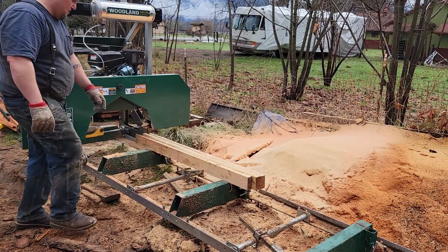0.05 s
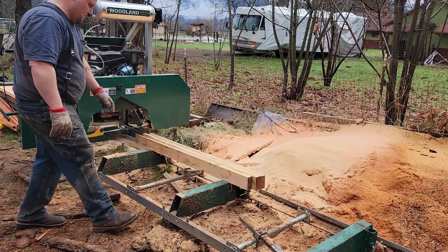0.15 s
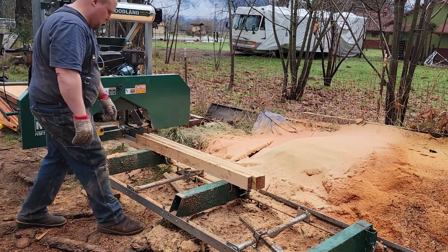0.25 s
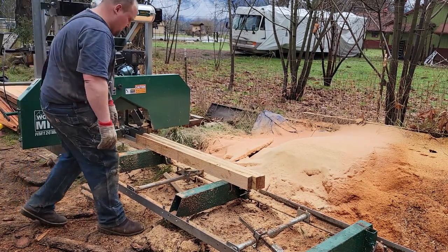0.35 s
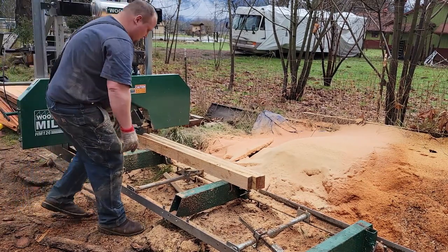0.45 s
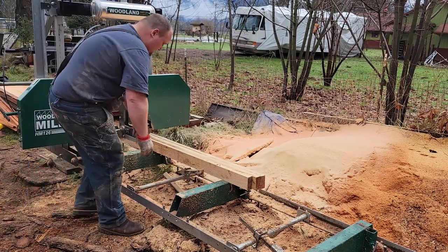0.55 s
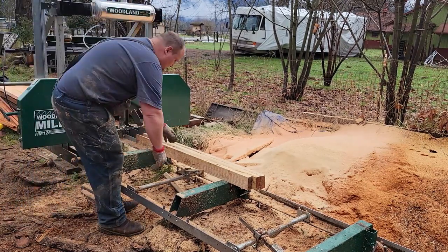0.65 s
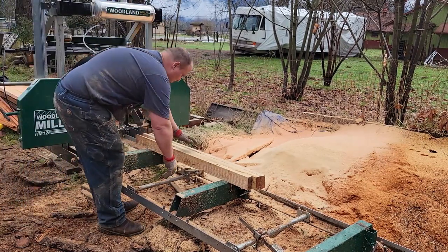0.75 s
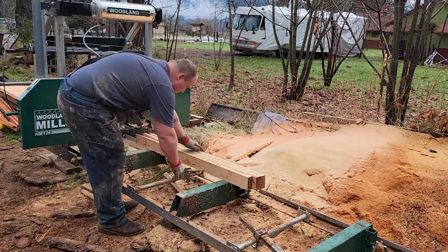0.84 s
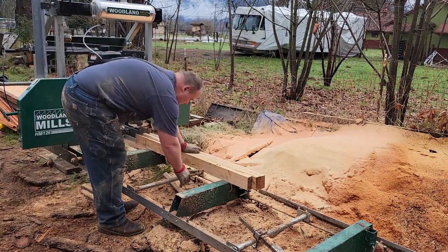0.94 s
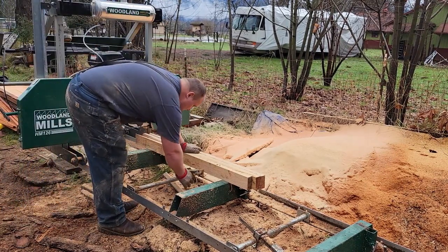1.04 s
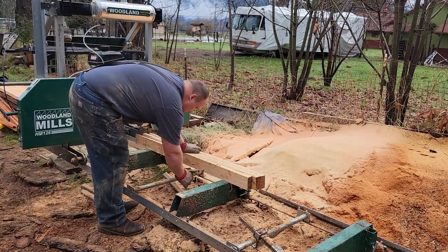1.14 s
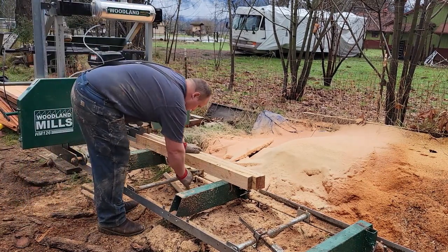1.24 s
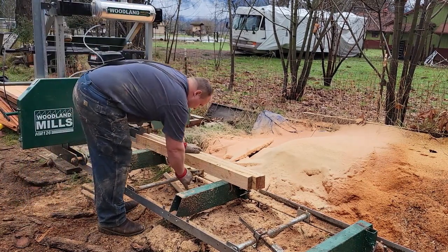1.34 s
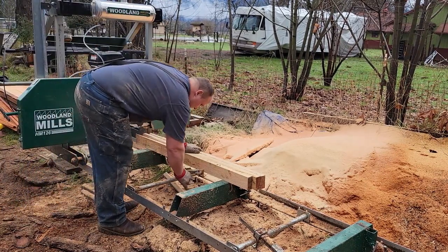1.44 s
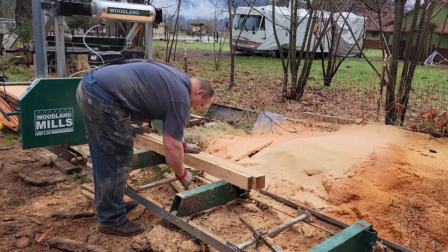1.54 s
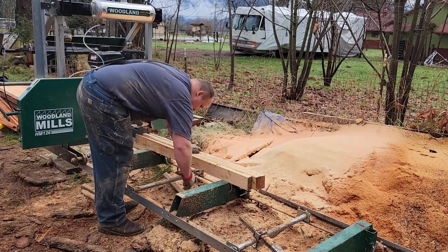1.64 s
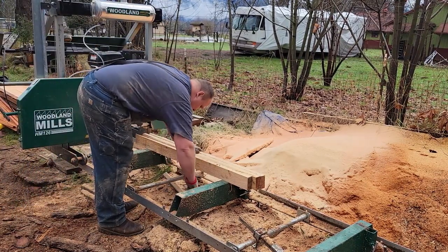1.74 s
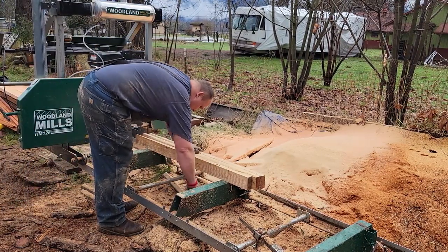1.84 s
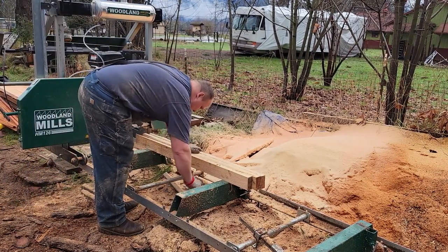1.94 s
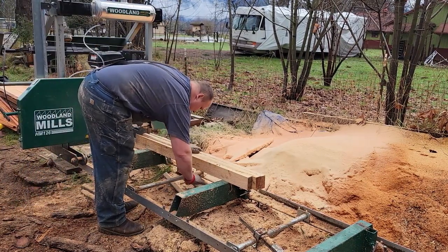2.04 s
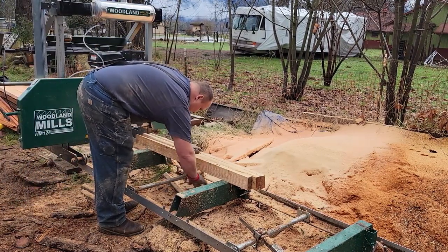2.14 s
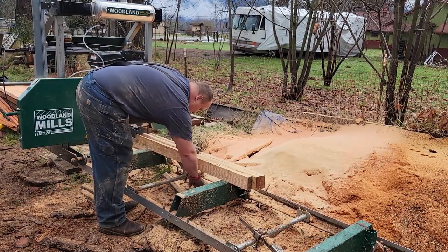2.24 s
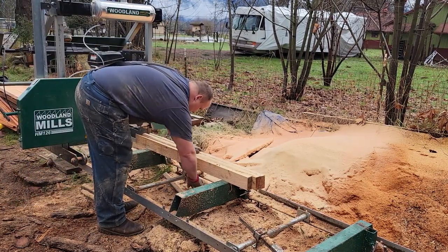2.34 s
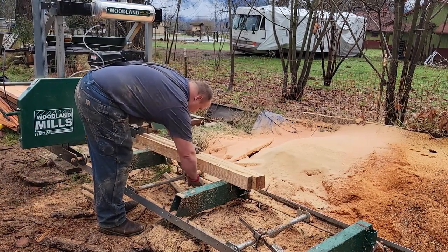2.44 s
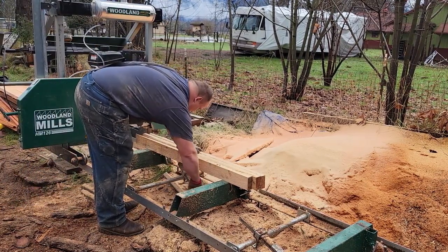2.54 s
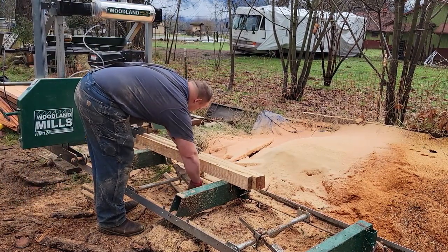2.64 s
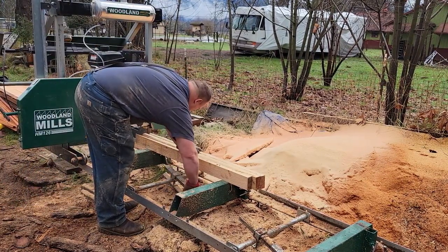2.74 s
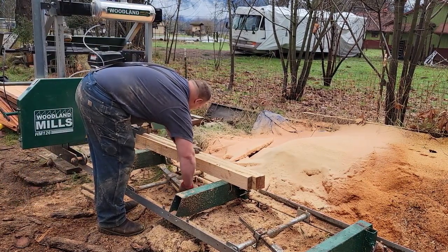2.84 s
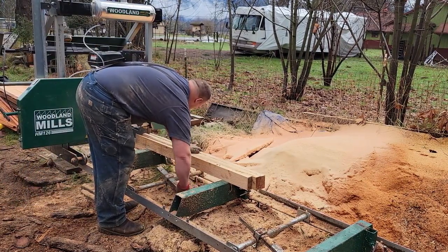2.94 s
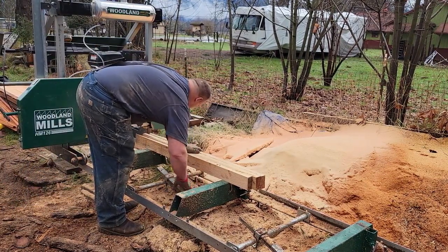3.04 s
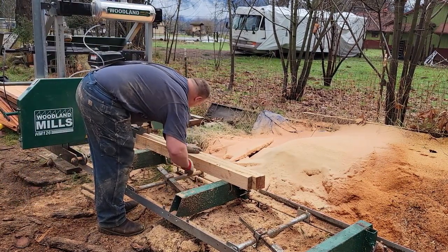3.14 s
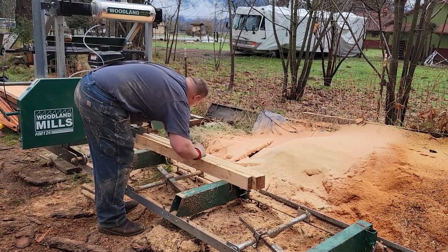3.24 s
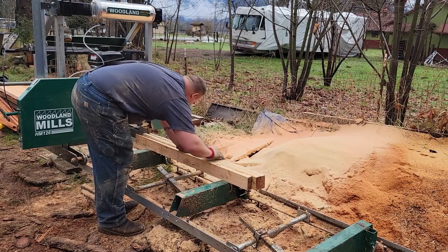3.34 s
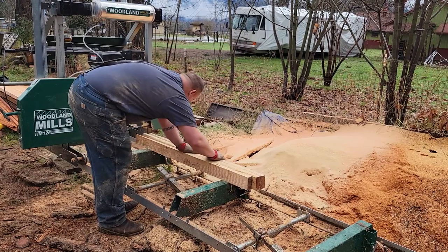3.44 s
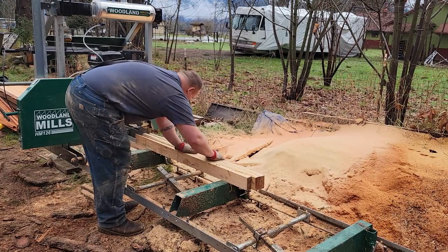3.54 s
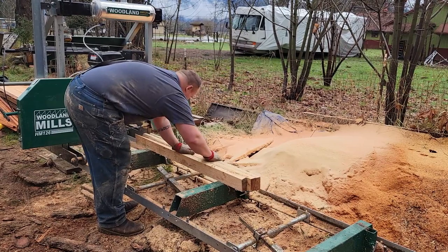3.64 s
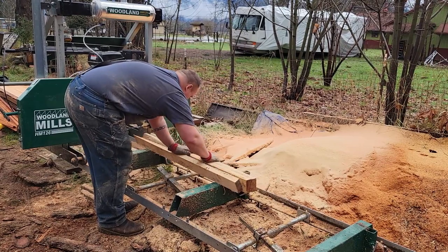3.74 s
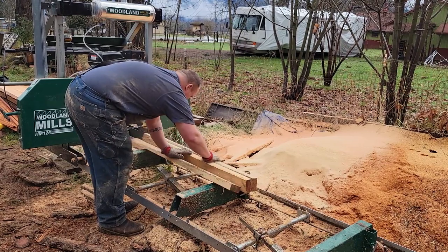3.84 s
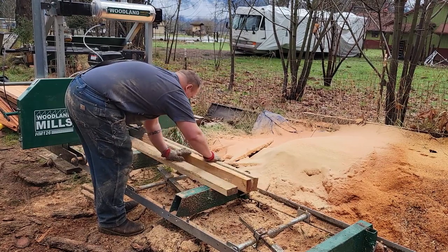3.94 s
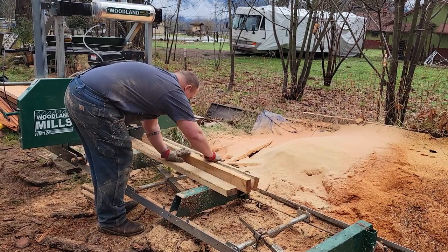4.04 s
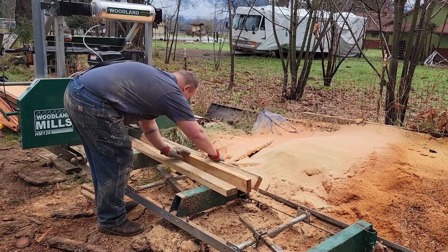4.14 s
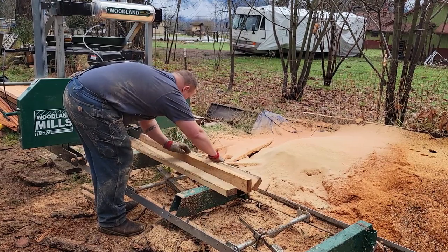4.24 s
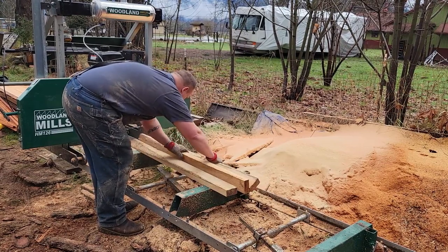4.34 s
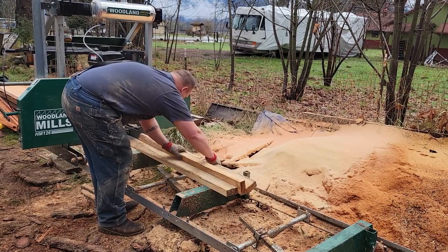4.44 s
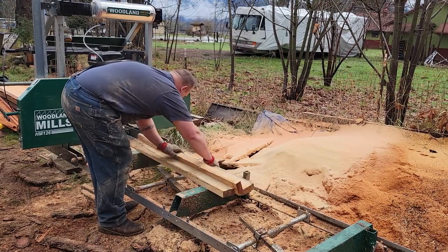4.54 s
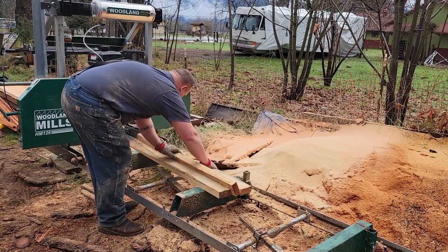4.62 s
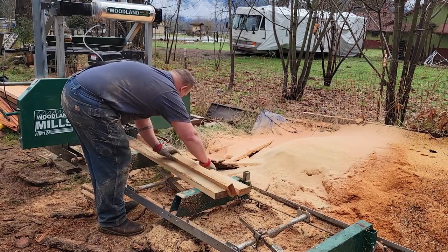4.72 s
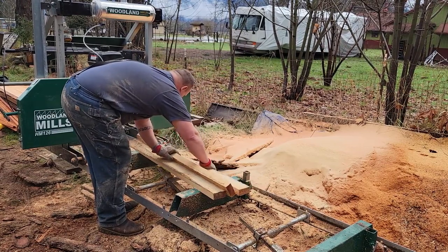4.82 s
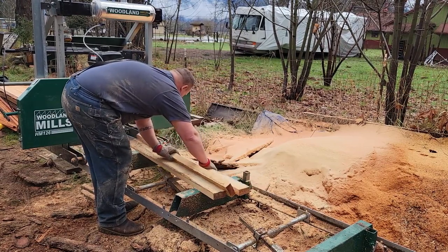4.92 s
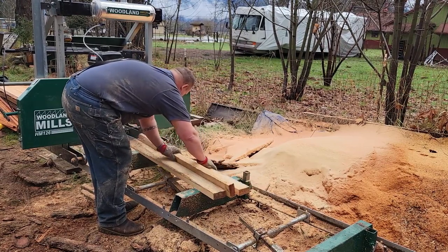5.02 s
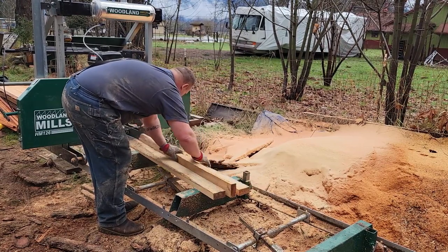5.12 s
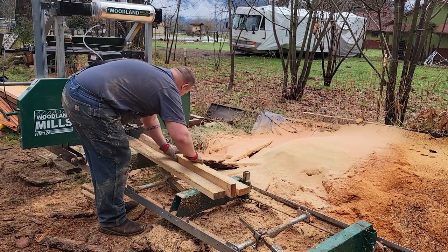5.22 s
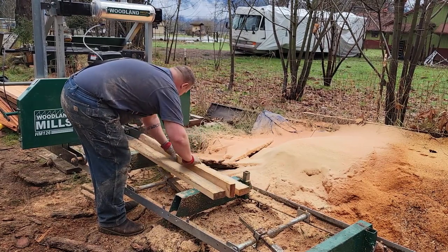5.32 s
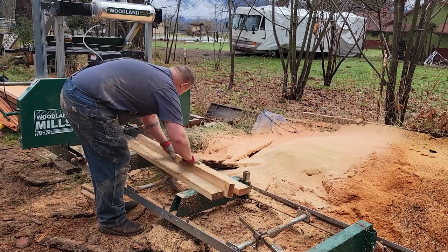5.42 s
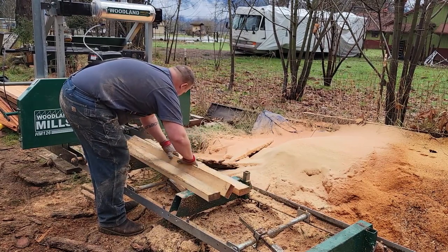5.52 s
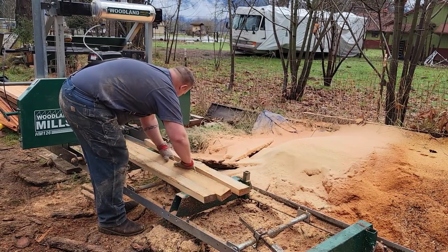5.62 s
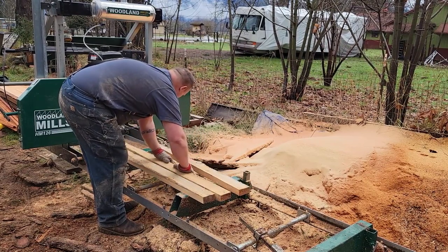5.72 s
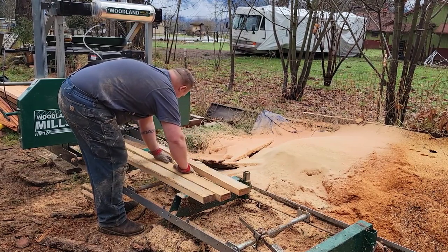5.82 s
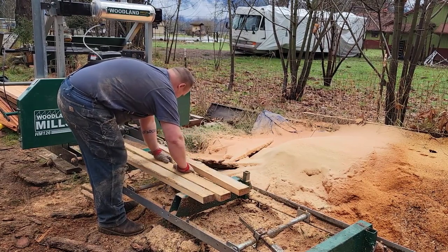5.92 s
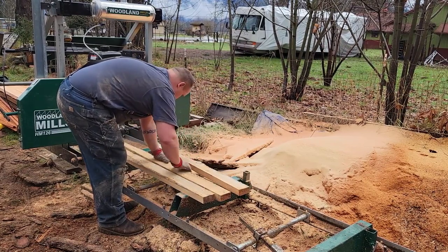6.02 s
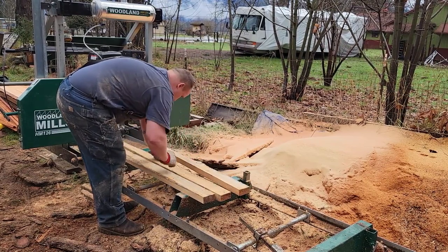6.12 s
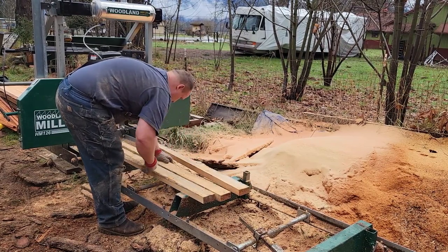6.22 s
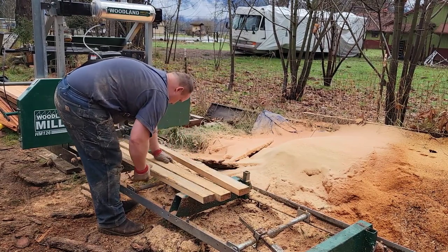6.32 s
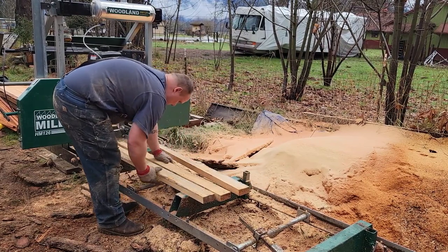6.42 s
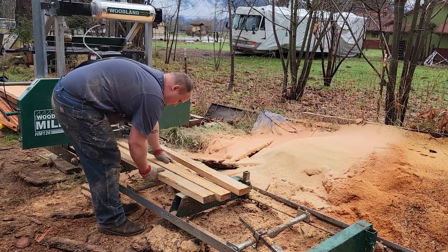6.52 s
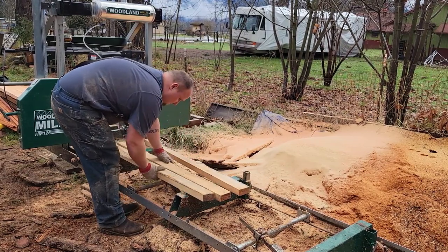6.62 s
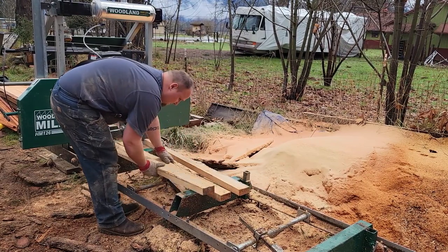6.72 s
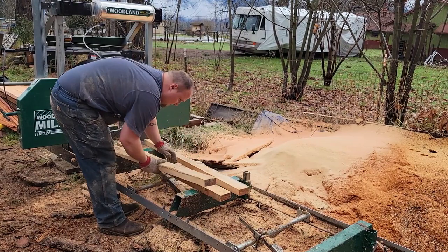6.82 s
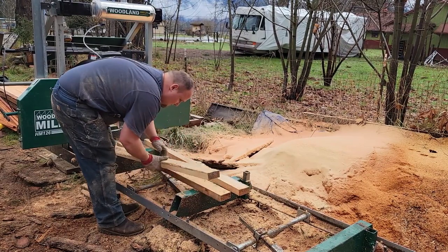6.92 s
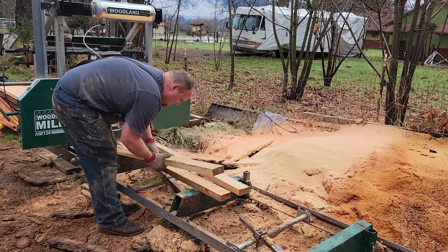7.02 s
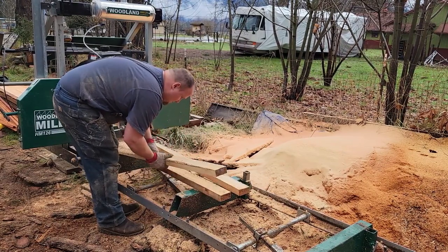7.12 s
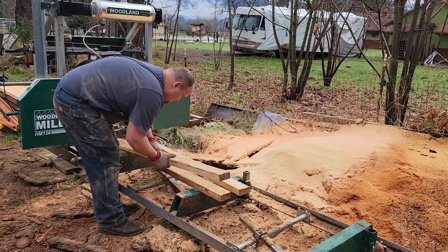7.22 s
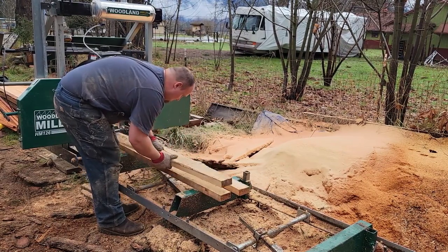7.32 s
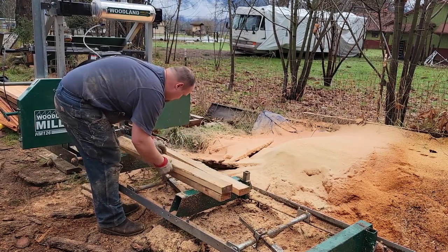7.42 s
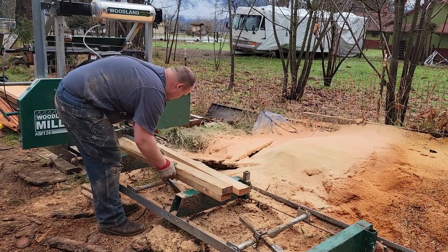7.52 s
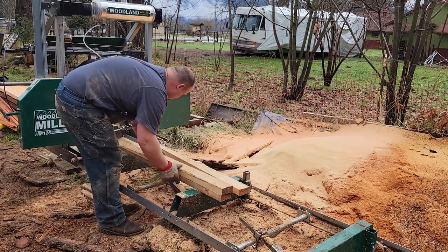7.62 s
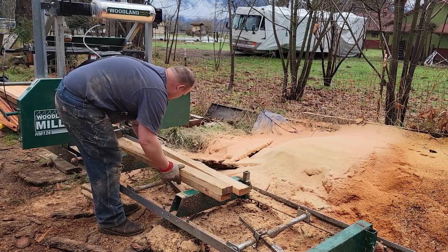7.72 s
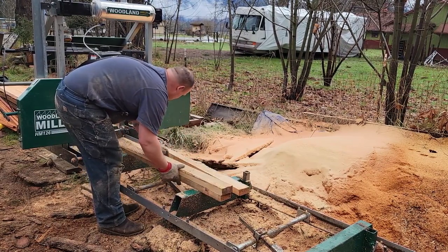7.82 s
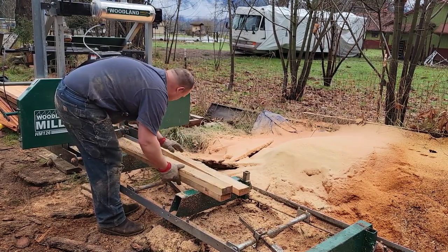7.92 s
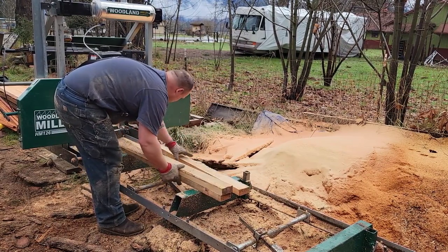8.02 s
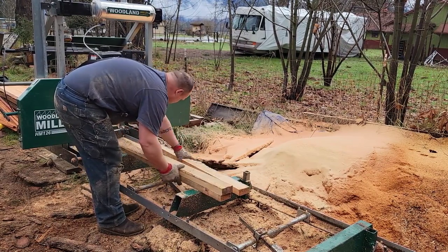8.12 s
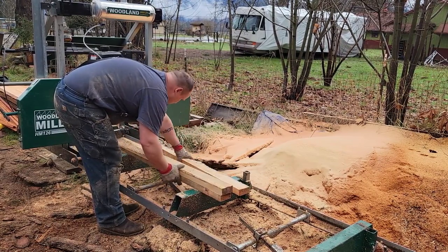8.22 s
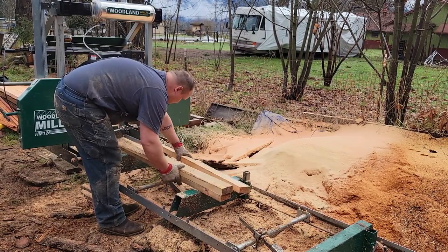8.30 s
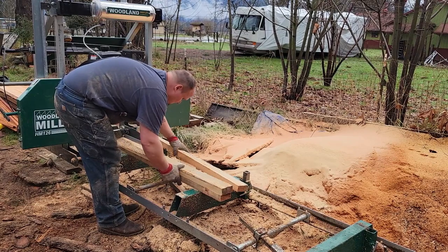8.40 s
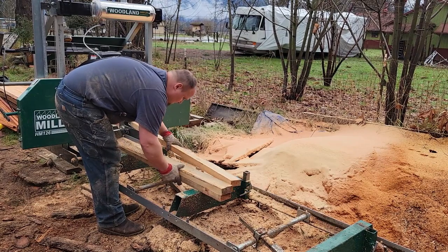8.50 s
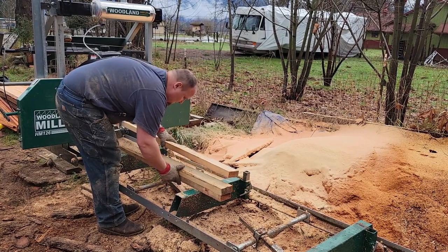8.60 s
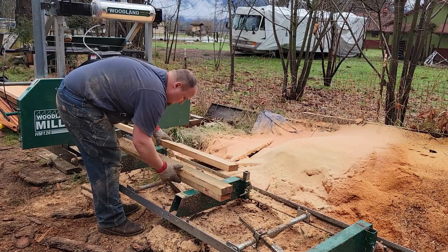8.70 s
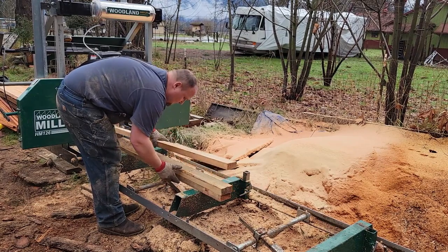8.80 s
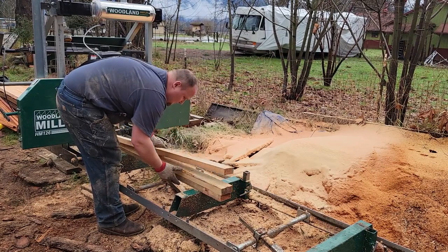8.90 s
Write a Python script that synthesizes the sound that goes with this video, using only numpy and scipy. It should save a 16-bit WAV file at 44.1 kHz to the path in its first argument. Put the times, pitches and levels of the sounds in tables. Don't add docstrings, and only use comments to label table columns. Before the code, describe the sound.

Boots crunch lightly in sawdust, followed by a hard metallic clank, rattling and a short grating scrape of steel on steel. Then wood takes over: one heavy board drop with fast bounces, small taps, a firm knock, an even harder drop, and later a sharp double clack. It ends with faint wooden touches. Heard close, in stereo, in an open yard with short scatter and a weak bass hum.

```python
import sys
import numpy as np
from scipy import signal
from scipy.io import wavfile
from scipy.ndimage import uniform_filter1d

SR = 44100
rng = np.random.default_rng(int(sys.argv[2]) if len(sys.argv) > 2 else 0)


def pcm_store(signal):
    levels = np.round(np.clip(np.atleast_2d(signal), -1, 1) * 32767)
    wavfile.write(sys.argv[1], SR, levels.astype(np.int16).T)


def boost_factor(decibels):
    exponent = np.asarray(decibels, float) / 20
    return 10 ** exponent


N = 395136

BOARD_LAG_S, STEEL_LAG_S = 0.00012, 0.00042


def rms_one(x):
    return x / np.sqrt(np.mean(x ** 2) + 1e-20)


def at_hz(points, hz):
    table_hz, value = np.array(points).T
    return np.interp(np.log(hz), np.log(table_hz), value)


def drift(rate_hz):
    r = np.exp(-80 * np.pi * rate_hz / SR)
    slow = signal.lfilter([1], [1, -2 * r, r * r], rng.standard_normal(N // 40 + 2002))[2000:]
    return np.interp(np.arange(N) / 40, np.arange(len(slow)), rms_one(slow))


def ring(clicks, hz, t60_s):
    r = boost_factor(-60 / (np.clip(t60_s, 0.005, 1.2) * SR))
    w = 2 * np.pi * hz / SR
    return signal.lfilter([0, np.sin(w)], [1, -2 * r * np.cos(w), r * r], clicks + 1e-18)


def fade(clicks, decay_s):
    return signal.lfilter([1], [1, -np.exp(-1 / (decay_s * SR))], clicks + 1e-18)


def band(x, low_hz, high_hz):
    sos = signal.butter(2, [low_hz, min(high_hz, 0.45 * SR)], "band", fs=SR, output="sos")
    return signal.sosfilt(sos, x + 1e-18)


def high_pass(x, order, hz):
    return signal.sosfilt(signal.butter(order, hz, "high", fs=SR, output="sos"), x)


def grains(per_s, spread_db):
    sizes = boost_factor(spread_db * np.minimum(rng.exponential(1, N), 4)) * rng.standard_normal(N)
    return rms_one(sizes * (rng.random(N) < per_s / SR))


def clicks_at(rows, gains):
    out = np.zeros((2, N))
    out[:, [min(round(row[0] * SR), N - 1) for row in rows]] = gains
    return out


def strokes(rows, rise_db_s, fall_db_s):
    t = np.arange(N) / SR
    level_db, colour_db = np.full(N, -150.), np.zeros(N)
    for start_s, hold_s, top_db, tint_db in rows:
        before_s, after_s = np.maximum(start_s - t, 0), np.maximum(t - start_s - hold_s, 0)
        own_db = top_db - rise_db_s * before_s - fall_db_s * after_s
        colour_db = np.where(own_db > level_db, tint_db, colour_db)
        level_db = np.maximum(level_db, own_db)
    return level_db, colour_db


def late_right(x, lag_s):
    lag = round(lag_s * SR)
    return np.array([x[0], np.r_[np.zeros(lag), x[1, :N - lag]]])


# freq_hz, level_db_per_hz
HUM_SPECTRUM = [(20, -41.5), (35, -18.5), (55, -11), (75, 1), (100, -7), (130, -19.5), (230, -22.5),
                (400, -37), (700, -35.5), (1200, -39.5), (2500, -54.5), (5000, -57), (9000, -72.5),
                (15500, -68)]
# time_s, level_db
HUM_SWELL = [(0.0, -44.5), (0.22, -44), (0.42, -51.5), (0.5, -43.5), (2.49, -43.5), (2.59, -47.5),
             (3.89, -49), (3.97, -38), (4.16, -52), (4.72, -46), (5.01, -53), (5.37, -47), (7.14, -49.5),
             (7.51, -40), (7.66, -49.5), (8.96, -48.5)]
# freq_hz, likeness [-1..1]
HUM_LIKENESS = [(60, 0.97), (180, .93), (550, -0.1), (1400, -0.45), (3100, 0.05), (15000, .05)]


def hum():
    out, edges_hz = 0, 22 * 2 ** np.arange(0, 9.9, 0.4)
    white = rng.standard_normal((2, 2, N))
    time_s, level_db = np.transpose(HUM_SWELL)
    swell_db = np.interp(np.arange(N) / SR, time_s, level_db)
    for k, (low_hz, high_hz) in enumerate(zip(edges_hz, edges_hz[1:])):
        mid, side = band(white[k % 2], low_hz, high_hz)
        hz = np.sqrt(low_hz * high_hz)
        alike = np.clip(at_hz(HUM_LIKENESS, hz), -1, 1)
        base_db = swell_db if hz < 140 else np.mean(level_db)
        gain = boost_factor(at_hz(HUM_SPECTRUM, hz) + base_db + 26.5 + 0.52 * drift(3.1))
        out = out + gain * (np.sqrt(1 + alike) * mid + np.sqrt(1 - alike) * side * [[1], [-1]])
    return out


# start_s, hold_s, level_db, dryness_db
SCUFFS = [(0.0, 0.002, -54, -1.5), (.155, 0.015, -42, 17), (.685, 0.0025, -64.5, -3.5),
          (1.14, 0.009, -61, -5.5), (1.46, 0.069, -57, -2.5), (1.715, 0.0086, -65.5, -10.5),
          (1.83, 0.0072, -65, 3.5), (3.255, 0.0086, -74, 19), (3.415, 0.0043, -66.5, -5),
          (4.345, 0.0084, -93.5, -22), (4.99, 0.108, -81, 7), (5.47, 0.11, -86.5, 17),
          (6.585, 0.0041, -80.5, -18), (6.98, 0.069, -72, 0.5), (7.065, 0.0075, -57, 13),
          (7.35, 0.041, -71.5, 0), (8.12, 0.028, -66.5, 3), (8.775, 0.011, -101.5, 7)]
SCUFF_RISE_DB_S, SCUFF_FALL_DB_S = 1800, 600
# fastest_s, hold_s, level_db, dryness_db
FACE_SLIDES = [
    (3.84, 0.15, -60, 2.5),
    (4.47, 0.017, -74.5, -10),
    (4.61, 0.011, -66.5, 1),
    (5.365, 0.029, -71, 8),
    (5.67, 0.014, -62.5, 4),
    (7.42, .012, -67.5, 6),
]
FACE_RISE_DB_S, FACE_FALL_DB_S = 63, 700
# time_s, peak_db
SNAPS = [(0.1534, -39), (0.6872, -57), (1.4566, -40), (2.3722, -26), (2.376, -29), (3.918, -34),
         (4.2912, -37), (4.637, -39), (5.3906, -35), (5.693, -40), (6.5896, -66)]
IDLE_DB, IDLE_STIR_DB, IDLE_DRY_DB = -91.5, 2, -2.5
TREAD_DRY_SHARE, TREAD_FLOOR_DB = 0.9, -71
RUSTLE_LEFT_DB = 1.5


def rustle():
    idle = IDLE_DB + IDLE_STIR_DB * drift(2.5), IDLE_DRY_DB
    scuffs = strokes(SCUFFS, SCUFF_RISE_DB_S, SCUFF_FALL_DB_S)
    slides = strokes(FACE_SLIDES, FACE_RISE_DB_S, FACE_FALL_DB_S)
    moves = [scuffs, slides, idle]
    tread_gain = sum(boost_factor(db + 3.5 - TREAD_DRY_SHARE * dry_db) for db, dry_db in moves)
    tread_gain = tread_gain + boost_factor(TREAD_FLOOR_DB + 2.3 * drift(7.7))
    rub_gain = sum(boost_factor(db - 6.0) for db, _ in moves)
    crackle_gain = sum(boost_factor(db + dry_db - 24.5) for db, dry_db in moves)
    tread = rms_one(band(grains(1700, 0.43), 250, 1400)) * tread_gain * boost_factor(-3.0)
    rub = rms_one(band(grains(3000, 2.8), 1000, 6000)) * rub_gain
    crackle = rms_one(band(grains(9000, 4.2), 3000, 7100)) * crackle_gain
    snaps = band(clicks_at(SNAPS, boost_factor(np.array(SNAPS)[:, 1] + 8.5)), 1100, 11000)
    return (tread + rub + crackle) * boost_factor(np.array([[1.], [-1.]]) * RUSTLE_LEFT_DB) + snaps


# start_s, hold_s, level_db, brightness_db
SETTLING = [(2.02, 0.057, -46, -8.5), (2.1, 0.12, -59, 1), (2.22, .01, -54, -5), (3.98, .03, -52.5, -18.5),
            (4.13, 0.027, -62.5, -34), (4.36, 0.012, -72, -14), (5.8, .05, -68, -29),
            (7.53, 0.016, -39.5, -9.5), (7.61, 0.047, -53.5, 1), (7.685, 0.024, -48.5, -18),
            (7.735, .015, -49.5, -15)]
SETTLE_RISE_DB_S, SETTLE_FALL_DB_S = 499, 237
# start_s, hold_s, level_db, depth_db
STEPS = [
    (.16, 0.0085, -52.5, 4.5),
    (.27, .005, -55, 7),
    (.3, .005, -59, -9),
    (.685, 0.0074, -51, 1.5),
    (2.385, 0.025, -48, -18),
    (3.99, 0.052, -43.5, -0.5),
    (4.49, 0.01, -47, -14),
    (7.2, .02, -71, 1.5),
    (8.545, 0.037, -67.5, 18),
]
STEP_RISE_DB_S, STEP_FALL_DB_S = 1500, 290


def settling():
    level_db, bright_db = strokes(SETTLING, SETTLE_RISE_DB_S, SETTLE_FALL_DB_S)
    grit = grains(5000, 2.0) + 0.6 * rng.standard_normal((2, N))
    grit = grit * boost_factor(level_db + 2.5 * drift(35))
    lower = band(grit, 600, 2000) * boost_factor(4.5)
    upper = band(band(grit * boost_factor(bright_db), 1200, 2300), 1200, 2300) * boost_factor(4.0)
    step_db, depth_db = strokes(STEPS, STEP_RISE_DB_S, STEP_FALL_DB_S)
    ground = rng.standard_normal(N) * boost_factor(step_db + 23)
    thump = band(band(ground, 180, 370), 180, 370)
    deep = band(ground * boost_factor(depth_db - 6.5), 86, 210)
    return lower + upper + thump + deep


# start_s, hold_s, level_db, freq_hz
BRUSHES = [
    (1.142, 0.003, -55.5, 2543),
    (1.135, 0.0036, -54, 3030),
    (1.456, 0.071, -59, 2885),
    (1.459, .05, -65, 1800),
    (1.711, 0.0042, -61.5, 3250),
]
BRUSH_RISE_DB_S, BRUSH_FALL_DB_S, BRUSH_WIDTH_HZ = 4200, 502, 100


def brushes():
    out, noise = np.zeros(N), rng.standard_normal(N)
    for start_s, hold_s, top_db, hz in BRUSHES:
        level_db, _ = strokes([(start_s, hold_s, top_db, 0)], BRUSH_RISE_DB_S, BRUSH_FALL_DB_S)
        out += ring(noise * boost_factor(level_db - 16.5), hz, 2.0 / BRUSH_WIDTH_HZ)
    return out


# time_s, peak_db
KNOCKS = [
    [(3.9175, -5), (3.922, -6.5), (3.943, -11.5), (3.969, -16), (3.997, -19.5), (4.029, -25),
     (4.069, -32.5), (4.09, -35)],
    [(4.288, -28.5)],
    [(4.484, -27.5), (4.499, -24), (4.544, -40.5), (4.579, -60)],
    [(4.627, -14.5), (4.640, -11.5), (4.654, -23), (4.695, -33.5)],
    [(5.383, -29), (5.391, -22), (5.445, -41.5), (5.559, -46), (5.602, -44.5), (6.894, -51.5),
     (1.55, -41.5)],
    [(5.6915, -2.5), (5.697, -10), (5.714, -9.5), (5.729, -16.5), (5.749, -24.5), (5.77, -34), (5.806, -32),
     (5.845, -45), (5.88, -43)],
    [(7.432, -20), (7.438, -9.5), (7.451, -41)],
    [(7.473, -4), (7.481, -3.5), (7.494, -16.5), (7.519, -17), (7.544, -19), (7.575, -28), (7.6, -33),
     (7.635, -33.5), (7.69, -38.5)],
    [(8.542, -37)],
    [(8.944, -27.5), (8.950, -22.5)],
]
# freq_hz, level_db, t60_s
BOARDS = [
    [(240, -16, 0.12), (305, -17, 0.17), (469, -6.5, 0.5), (494.5, -8, 1), (567, -7, 0.4),
     (643.6, -8.5, 0.23), (693.5, -2.5, 0.3), (735.8, 1, .3), (920, -16.5, .2), (963, -10.5, .1),
     (1160, -10, .18), (1460, -21, 0.11), (1830, -16, .1)],
    [(443, -1, 0.17), (673, -4.5, 0.28), (770, -13, 0.083), (944, 1, 0.18), (1110, -17, 0.12),
     (1196, -9.5, 0.16)],
    [(272, -21.5, 0.17), (456, -5.5, .35), (623, 1, 0.088), (688, 3.5, 0.11), (760, -11, 0.17),
     (947, -7.5, 0.23), (1224, -20, 0.25)],
    [(236, -13, 0.081), (453.6, -4.5, 0.72), (647.6, 3, 0.032), (741.5, -9, 0.24), (779, -17, 0.14),
     (893, -8, 0.29), (1078, -22, 0.19), (1160, -22.5, 0.15), (1422, -25.5, 0.17), (1797, -20.5, 0.21)],
    [(254.7, -13.5, 0.098), (470, -8.5, 0.27), (703.4, 1.5, 0.054), (801, -20, 0.22), (950, -21, 0.15),
     (960, -7.5, 0.07)],
]
# freq_hz, level_db, t60_s
MORE_BOARDS = [
    [(249.7, -9, 0.12), (464.6, -10, 0.44), (493.4, -12, .62), (553, -14, 0.47), (686, -4, 0.2),
     (703, 4, 0.056), (947, -2.5, 0.25), (987, -9, .2), (1300, -13, .21), (1518, -9.5, 0.24),
     (640, -10.5, .15), (1730, -10, .1)],
    [(300, -9.5, 0.036), (460, -7, .1), (736, 5, 0.04), (954, -14.5, 0.14), (1496, -11.5, 0.087),
     (1930, -20.5, 0.038)],
    [(183.4, -17.5, .9), (290.6, -4.5, 0.083), (496.5, -2, 0.61), (432, -10.5, 0.24), (603, -10.5, 0.092),
     (662, -3, 0.21), (736, -8, 0.3), (874, -10.5, 0.033), (931, 4.5, 0.038), (1173, 3.5, 0.1),
     (1353, -14.5, 0.12), (1540, -12.5, .15), (1745, -5, .1), (1850, -11, 0.031)],
    [(199, -9, 0.34), (304, -7, 0.04), (794, -10, 0.23)],
    [(263, -10, 0.11), (347, -4, .15), (474.5, -6.5, 0.13), (665.6, -3.5, 0.18), (1140, -14, 0.073)],
]
# crack_db (re peak), left_minus_right_db, thud_db (re peak)
CONTACTS = [
    (-23.5, 2, -31.5),
    (-42, 5.5, -32.5),
    (-69, 6.5, -56),
    (-48, 2.7, -39.5),
    (-50, 2, -44.5),
    (-37, 3, -33.5),
    (-30, 3, -38.5),
    (-21.5, 3, -28.5),
    (-32.5, 7, -37),
    (-39.5, 5, -42),
]
BOUNCE_DULLING = 0.8
BOUNCE_TILT = 0.35
MODE_T60_SCALE, MODE_MAX_CYCLES = 0.53, 170


def boards():
    out, chatter = np.zeros((2, N)), rng.standard_normal((2, N))
    thuds, cracks = np.zeros((2, 2, N))
    for knocks, modes, (crack_db, pan_db, thud_db) in zip(KNOCKS, BOARDS + MORE_BOARDS, CONTACTS):
        time_s, peak_db = np.transpose(knocks)
        count, below_db = len(time_s), peak_db - max(peak_db)
        side_db = np.array([[0.5], [-0.5]]) * pan_db
        heard = slice(int(min(time_s) * SR) - 10, int((max(time_s) + 0.7) * SR))
        body = np.zeros((2, N))
        for k, (hz, level_db, t60_s) in enumerate(modes):
            spot_db = rng.standard_normal((count, 1)) + 0.8 * rng.standard_normal((count, 2))
            sign = (-1) ** (k * (1 + np.arange(count)) // 2)
            place = 1.3 * k % 3.3
            tilt_db = BOUNCE_TILT * np.maximum(below_db, -20) * np.log2(hz / 600)
            mode_side_db = side_db * hz / (hz + 300)
            gains = sign * boost_factor(peak_db + mode_side_db + level_db + spot_db.T + tilt_db)
            blows = late_right(clicks_at(knocks, gains), BOARD_LAG_S * place)[:, heard]
            body[:, heard] += ring(blows, hz, np.clip(MODE_T60_SCALE * t60_s, 0.02, MODE_MAX_CYCLES / hz))
        body = fade(body, 0.00006)
        out += body / np.max(np.abs(body)) * boost_factor(max(peak_db) + 3.0)
        thuds += clicks_at(knocks, boost_factor(peak_db + side_db + thud_db))
        cracks += clicks_at(knocks, boost_factor(peak_db + side_db + crack_db + BOUNCE_DULLING * below_db - 21.0))
    push = fade(fade(thuds, 0.0021), 0.0067)
    out += band(band(chatter[0] * push, 450, 1200), 450, 1200) * boost_factor(-3.0)
    crack = chatter[1] * fade(fade(cracks, 0.00098), 0.0063)
    out += band(crack, 1100, 2200) * boost_factor(11.5)
    out += band(crack, 2700, 3300) * boost_factor(1.5)
    out += band(crack, 4200, 16000) * boost_factor(-26.5)
    return high_pass(out, 4, 170)


# freq_hz, level_db, t60_s
BUNK = [(187.3, -51, 0.6), (490, -43, 0.35)]


def bunk(blows):
    return sum(boost_factor(level_db - 19.0) * ring(blows, hz, t60_s) for hz, level_db, t60_s in BUNK)


# time_s, peak_db
CLAMP_HITS = [(1.8721, -58.5), (1.9144, -26), (1.9324, -32), (1.941, -12.5), (1.958, -32.5), (2.004, -45),
              (2.3013, -55.5), (2.3715, -39.5), (2.373, -26), (2.742, -37), (2.778, -33.5), (2.791, -41.5)]
# freq_hz, level_db, t60_s
CLAMP_MODES = [(516.5, -2, 0.3), (767.0, -5.5, 0.39), (960, -3.5, 0.28), (1127, -9.5, 0.19),
               (1530, 7.5, 0.32), (1760, -5.5, 0.25), (2008, -3.5, 0.35), (2250, -24.5, 0.28),
               (2900, 2.5, 0.15), (2600, -11.0, 0.25), (2488, -7.5, 0.27), (3030, -4.5, 0.54),
               (3280, -4.5, 0.18), (3650, -7.5, 0.054), (4100, -6.5, 0.098), (4460, -16.5, 0.12),
               (5800, -18.5, 0.15), (5400, -11.5, 0.2), (8000, -17.0, 0.052), (7900, -12.0, 0.036),
               (9130, -37, 0.14), (9630, -55.0, 1.1), (10860, -14.5, 0.043), (10200, -20, 0.064),
               (12884, -12.0, 0.067)]
CLAMP_RING_S = 0.13


def clamp_blows(heard):
    hits = clicks_at(CLAMP_HITS, boost_factor(np.array(CLAMP_HITS)[:, 1] - 16.0))
    taps = fade(hits, 0.0001)[:, heard] * boost_factor(7.5)
    rattle = (fade(hits, 0.0035) * rng.standard_normal(N))[:, heard]
    out = band(rattle, 900, 4900) * boost_factor(24.0) + band(rattle, 4000, 14000) * boost_factor(-8.0)
    t = np.arange(N)[heard] / SR
    hit = np.searchsorted(np.array(CLAMP_HITS)[:, 0], t + 2 / SR)
    for hz, mode_db, t60_s in CLAMP_MODES:
        spot = boost_factor(2.5 * rng.standard_normal(len(CLAMP_HITS) + 1))[hit]
        gain = boost_factor(mode_db - 20.5 + rng.standard_normal((2, 1)))
        out = out + gain * ring((taps + 0.34 * rattle) * spot, hz, min(0.5 * t60_s, CLAMP_RING_S))
    return out


# start_s, hold_s, level_db, brightness_db
JOLTS = [
    (1.873, 0.0031, -43.5, -28.5),
    (1.912, 0.0028, -21, -18.5),
    (1.93, 0.0088, -17, -17),
    (1.99, 0.025, -34.5, -40),
    (2.04, 0.034, -55.5, -29),
    (2.11, 0.047, -59.5, -21),
    (2.305, 0.047, -54.5, -33),
    (2.369, 0.0042, -32.5, -0.5),
]
JOLT_RISE_DB_S, JOLT_FALL_DB_S = 3000, 450
# time_s, level_db, brightness_db
DRAG = [
    [(2.49, -55, -16), (2.502, -62, -32), (2.574, -40, -27), (2.594, -38.5, -39), (2.608, -40.5, -17),
     (2.648, -41, -47), (2.7, -54, -21)],
    [(2.7, -50, -12.5), (2.748, -37.5, -2), (2.76, -40, -15), (2.78, -31, -16.5), (2.834, -40, -8),
     (2.94, -37.5, -17.5), (2.986, -60.5, -45), (3.04, -68, -21)],
]
# freq_hz, width_hz, jolts_db, first_pull_db, second_pull_db
RUB_RINGS = [(524, 32, -4.5, -27, -15), (670, 36, -2.5, 8.5, 0.5), (940, 44, -5, 4, 3),
             (1229, 47, 1, -3, 2.5), (1400, 60, 3, 3.5, 4.5), (1680, 37, 4.5, 0.5, 5),
             (1850, 45, 0.5, -7, -2), (2010, 80, 0, -29, -11.5), (2420, 60, -2, -22, -22.5),
             (2950, 80, -0.5, -4.5, -4), (4794, 160, -0.5, -3, 1.5), (6180, 80, -6, -2, -13.5),
             (7710, 39, -10.5, -28, -20.5), (9400, 150, -16, -31, -30)]


def clamp_slide(heard, catch):
    t = np.arange(N)[heard] / SR
    jolt = np.array(strokes(JOLTS, JOLT_RISE_DB_S, JOLT_FALL_DB_S))[:, heard]
    time_s, pull_db, pull_bright_db = np.transpose(DRAG[0] + DRAG[1])
    drag = [np.interp(t, time_s, pull_db, left=-150, right=-150) + 2.6,
            np.interp(t, time_s, pull_bright_db) + 3.2]
    jolting = jolt[0] > drag[0]
    level_db, bright_db = np.where(jolting, jolt, drag)
    phase = np.where(jolting, 0, np.where(t < DRAG[1][0][0], 1, 2))
    slips = (0.7 * grains(4000, 2.6) + 0.4 * rng.standard_normal((2, N)))[:, heard]
    slips = slips * boost_factor(catch[heard])
    wander = rms_one(uniform_filter1d(catch, size=600))
    out = band(slips, 800, 2600) * boost_factor(level_db - 8.5)
    out = out + band(slips, 2600, 7000) * boost_factor(level_db + bright_db - 36.5)
    for k, (hz, width_hz, *phase_db) in enumerate(RUB_RINGS):
        wander_db = 3 * np.roll(wander, 9000 * k + 9000)[heard]
        ring_db = level_db + np.array(phase_db)[phase] - 31.0 + (bright_db + 6.0) * (hz > 4000) + wander_db
        out = out + ring(slips * boost_factor(ring_db), hz, 2.5 / width_hz)
    return out


# freq_hz, level_db, t60_s
FRAME_LINE = (512, -41, .7)
FRAME_STRUCK = [
    (1.941,),
]


def clamp():
    heard = slice(int(1.8 * SR), int(3.3 * SR))
    catch = drift(45)
    hz, line_db, t60_s = FRAME_LINE
    out = ring(clicks_at(FRAME_STRUCK, boost_factor(line_db)), hz, t60_s) * boost_factor(3 * catch)
    out[:, heard] += high_pass(clamp_blows(heard) + clamp_slide(heard, catch), 2, 350)
    return out * boost_factor([[1.2], [-1.2]])


# freq_hz, t60_s
YARD_T60 = [(150, 0.2), (500, 0.3), (1500, 0.087), (4000, 0.11), (12000, 0.059)]
# delay_s, smear_s, level_db, low_hz, high_hz
FAR_WALL = (-1, 0.56, -33, 1100, 2598.5)
# t60_s, level_db, low_hz, high_hz
FAR_TAIL = (1.54, -34.5, 400, 800.5)
ALIKE_BELOW_HZ = 600


def yard(x):
    t, tail = np.arange(SR) / SR, 0
    for low_hz in 100 * 2. ** np.arange(7):
        left, other = band(rng.standard_normal((2, SR)), low_hz, 2 * low_hz)
        alike = 1 / (1 + (low_hz / ALIKE_BELOW_HZ) ** 2)
        noise = np.array([left, alike * left + np.sqrt(1 - alike ** 2) * other])
        tail = tail + noise * boost_factor(-60 * t / at_hz(YARD_T60, np.sqrt(2) * low_hz))
    delay_s, smear_s, wall_db, low_hz, high_hz = FAR_WALL
    wall = band(rng.standard_normal((2, SR)), low_hz, high_hz) * np.exp(-((t - delay_s) / smear_s) ** 2)
    t60_s, far_db, low_hz, high_hz = FAR_TAIL
    far = band(rng.standard_normal((2, SR)), low_hz, high_hz) * boost_factor(far_db - 60 * t / t60_s)
    tail = (tail + boost_factor(wall_db) * wall + far) * np.clip(t / 0.0051, 0, 1)
    return signal.fftconvolve(x, tail / np.sqrt(np.sum(tail ** 2) / 2), axes=1)[:, :N]


BOARD_SCATTER_DB, STEEL_SCATTER_DB = -12.5, -8


def scene():
    wood = late_right(boards(), BOARD_LAG_S)
    steel = late_right(clamp(), STEEL_LAG_S)
    handling = late_right(settling() + rustle() + brushes(), STEEL_LAG_S)
    rest = steel + bunk(wood + steel) + handling
    scatter = yard(boost_factor(BOARD_SCATTER_DB) * wood + boost_factor(STEEL_SCATTER_DB) * rest)
    return wood + rest + scatter + hum()


def roll_off(x):
    return signal.sosfilt(signal.butter(12, 15720, fs=SR, output="sos"), x)


def record(dry):
    dull = signal.sosfilt(signal.butter(2, 17000, fs=SR, output="sos"), dry)
    held = 1.2 * np.tanh(dull / 1.2)
    return roll_off(held)


dry = scene()
out = record(dry)
pcm_store(out)
```